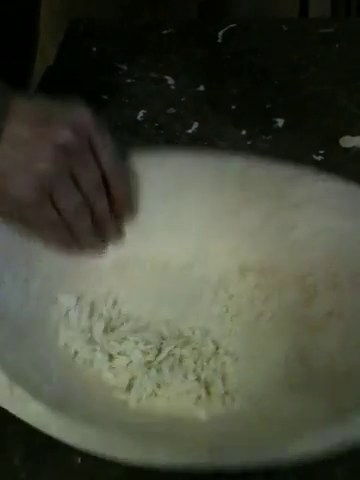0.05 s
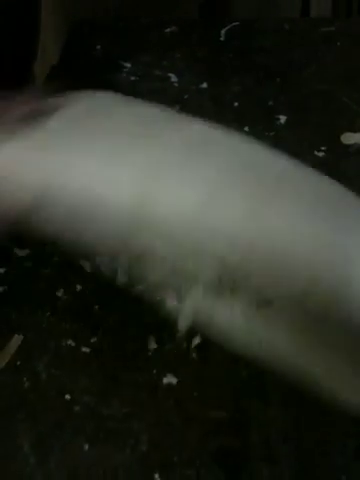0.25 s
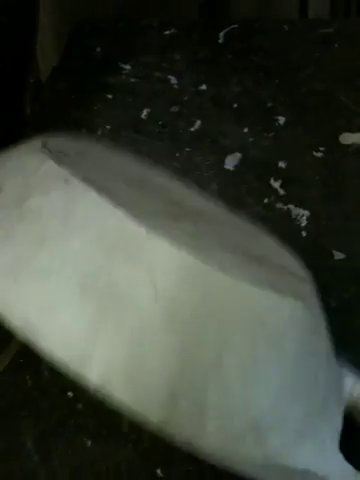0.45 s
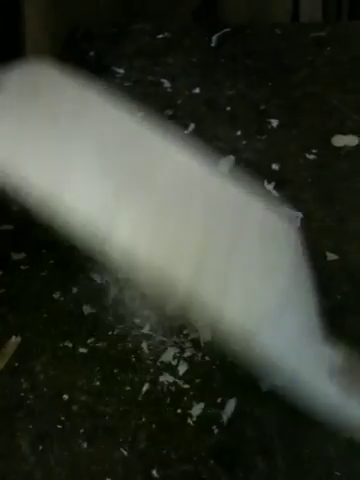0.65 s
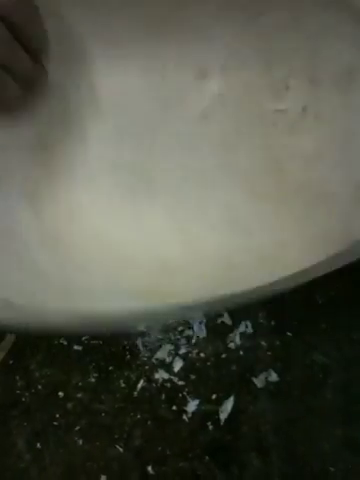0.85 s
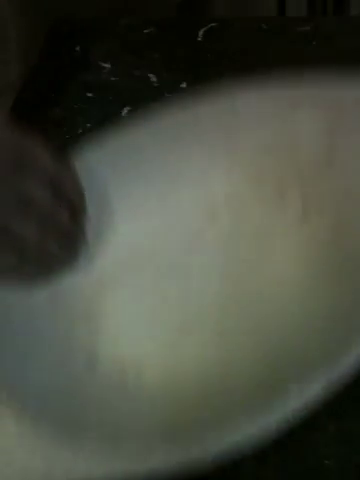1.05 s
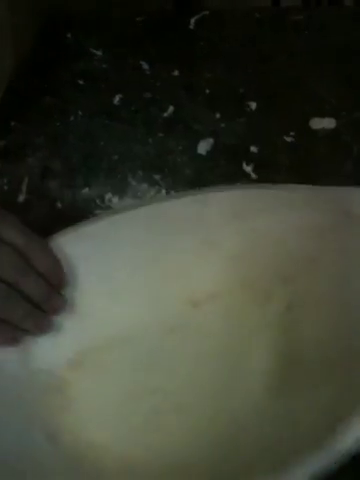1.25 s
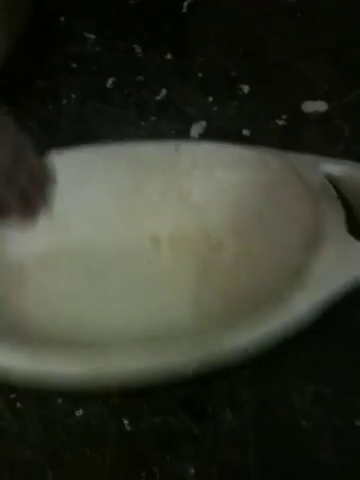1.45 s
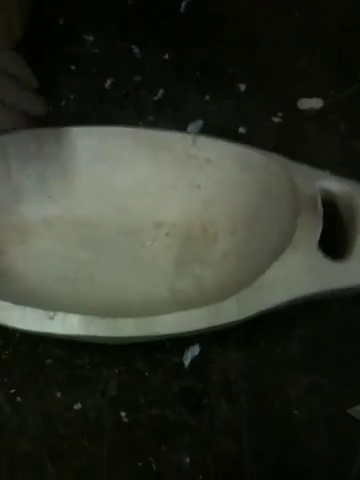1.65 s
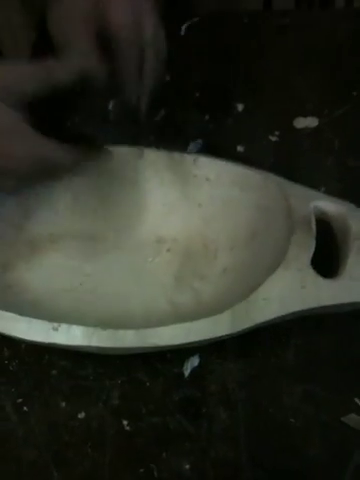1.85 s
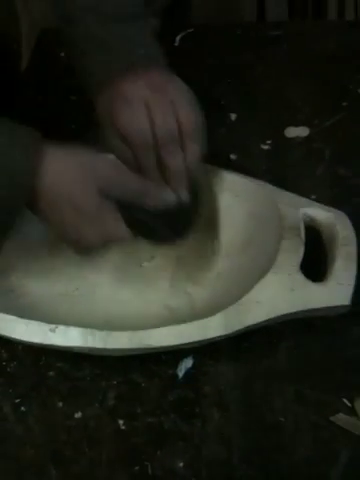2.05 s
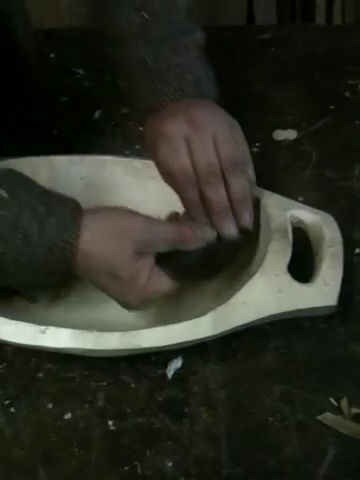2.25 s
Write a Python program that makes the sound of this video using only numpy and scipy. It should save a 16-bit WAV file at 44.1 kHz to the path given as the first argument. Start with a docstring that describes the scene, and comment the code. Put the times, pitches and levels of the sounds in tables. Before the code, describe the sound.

Hollow knocks of a wooden bowl on a bench, with soft tool strokes nearby.

```python
"""Wooden bowl on a workbench

A carved bowl is tipped over, knocked empty, rocked back and set down in a small workshop. Each impact
thuds in the bench and excites the damped modes of bowl and bench; edges click, the bowl scrapes
faintly, and two lighter clatters of taps are heard. Nearby a hand tool rubs to and fro over wood,
two strokes a second each way, its friction noise swelling with its speed."""
import sys
import numpy as np
from scipy import signal
from scipy.fft import rfft, irfft
from scipy.io import wavfile
from scipy.ndimage import uniform_filter1d

SR = 44100
rng = np.random.default_rng(int(sys.argv[2]) if len(sys.argv) > 2 else 0)


def dump(signal):
    """Clip the signal to [-1, 1] and save it as 16-bit WAV at the path in sys.argv[1]."""
    limited = np.clip(np.atleast_2d(signal).T, -1, 1)
    pcm = np.round(limited * 32767).astype(np.int16)
    wavfile.write(sys.argv[1], SR, pcm)


N = 105840

# spectrum of a contact tick: frequency_hz, relative_db
TICK_SPECTRUM = [(300, -24), (1000, 7), (1700, 2.5), (2800, 5.5), (3400, -6.5), (4100, -4.5), (4800, -19),
                 (5700, -11), (9000, -27), (16000, -53)]


def amp(db):
    """Decibels to amplitude ratio."""
    return 10 ** (np.asarray(db) / 20)


def unit_rms(x):
    """Normalisation to rms 1."""
    return x / np.sqrt(np.mean(x ** 2) + 1e-20)


def read(points, hz):
    """Interpolation on a log-frequency axis."""
    f, value = np.transpose(points)
    return np.interp(np.log(hz + 1), np.log(f + 1), value)


def add(mix, start_s, sound):
    """Superposition: a sound joins the mix at its start time."""
    at = round(start_s * SR)
    sound = sound[max(-at, 0):]
    part = mix[max(at, 0):][:len(sound)]
    part += sound[:len(part)]


def noise(spectrum):
    """Spectral shaping of white noise, rms 1."""
    gain = amp(read(spectrum, np.fft.rfftfreq(N, 1 / SR)))
    return unit_rms(irfft(rfft(rng.standard_normal(N)) * gain, N))


def pulse(spectrum, corner_hz=None, size=4096, rolloff_order=3.47):
    """Minimum-phase impact pulse, energy 1; a soft contact acts as a low-pass filter."""
    hz = abs(np.fft.fftfreq(size, 1 / SR))
    gain = amp(read(spectrum, hz))
    if corner_hz:
        gain = gain / np.hypot(1, np.minimum(hz / corner_hz, 20) ** rolloff_order)
    log_response = np.conj(signal.hilbert(np.log(gain)))
    out = np.fft.ifft(np.exp(log_response)).real[:size // 2]
    return out / np.linalg.norm(out)


def dense_modes(t60_s, size=8192):
    """Modal overlap: the crowded modes of wood merge into decaying noise, energy 1."""
    out = rng.standard_normal(size) * amp(-60 * np.arange(size) / SR / t60_s)
    return out / np.linalg.norm(out)


def rub(hz, width_hz):
    """Forced resonance: friction noise drives two resonators in series along the curve hz, rms 1."""
    phasor = np.exp(2j * np.pi * np.cumsum(hz) / SR)
    pole = np.exp(-np.pi * width_hz / SR)
    x = rng.standard_normal(len(hz))
    for _ in range(2):
        x = 2 * (phasor * signal.lfilter([1 - pole], [1, -pole], x / phasor)).real
    return unit_rms(x)


def background():
    """Noise floor: stationary broadband noise, strongest in the low middle range."""
    # frequency_hz, relative_db
    floor_spectrum = [(25, -32), (70, -16), (130, -1), (200, 5), (450, 8), (800, 2), (2500, -5),
                      (3600, -13.5), (8000, -18.5), (16000, -29.5)]
    return amp(-47.5) * noise(floor_spectrum)


def reverberation(x, size=32768, gap_samples=200):
    """Diffuse field: after a short gap, each band decays exponentially at its own rate."""
    # decay of the workshop: frequency_hz, t60_s
    decay_times = [(100, 0.44), (250, 0.47), (500, 0.32), (1500, 0.15), (4000, 0.14), (12000, 0.12)]
    hz, t, bands = signal.stft(rng.standard_normal(size), SR, nperseg=256)
    decay = np.exp(-np.log(1000) * t / read(decay_times, hz)[:, None])
    tail = signal.istft(bands * decay, SR, nperseg=256)[1]
    tail[:gap_samples] = 0
    return signal.fftconvolve(x, tail / np.linalg.norm(tail))[:N]


def patchy(x, depth_db=1.5, patch_hz=298, patch_s=0.027, size=512):
    """Random spectral modulation: the colour of friction wanders in small patches, rms 1."""
    hop = size // 4
    bands = signal.stft(x, nperseg=size, noverlap=size - hop)[2]
    field = uniform_filter1d(rng.standard_normal(bands.shape), round(patch_hz * size / SR), axis=0)
    field = unit_rms(uniform_filter1d(field, round(patch_s * SR / hop), axis=1))
    out = signal.istft(bands * amp(depth_db * field), nperseg=size, noverlap=size - hop)[1]
    return unit_rms(out[:len(x)])


def arch(length_s, skew, shape):
    """Amplitude envelope of one swell; a skew above 1 peaks late, a higher shape is narrower."""
    return abs(np.sin(np.pi * np.linspace(0, 1, round(length_s * SR)) ** skew)) ** shape


def strokes(rows, spectrum, skew, shape, fizz_skew_ratio, fizz_shape_ratio, fizz_extra_s):
    """Sliding friction: grainy hiss swells with tool speed; a hollow resonance glides and lingers."""
    grain_db, grain_s, linger_s = 1, 0.00214, 0.027
    lowpass = signal.butter(2, 4600, fs=SR, output="sos")
    out = np.zeros(N)
    for start_s, length_s, hiss_db, hollow_db, from_hz, to_hz in rows:
        roughness = unit_rms(uniform_filter1d(rng.standard_normal(N), round(grain_s * SR)))
        hiss = amp(hiss_db + grain_db * roughness) * patchy(noise(spectrum))
        body = signal.sosfiltfilt(lowpass, hiss)
        fizz = hiss - body
        swell = arch(length_s, skew, shape)
        add(out, start_s, swell * body[:len(swell)])
        swell = arch(length_s + fizz_extra_s, skew * fizz_skew_ratio, shape * fizz_shape_ratio)
        add(out, start_s, swell * fizz[:len(swell)])
        swell = arch(length_s + linger_s, skew=0.97, shape=1.46)
        hollow = rub(np.linspace(from_hz, to_hz, len(swell)), width_hz=105)
        add(out, start_s, amp(hollow_db) * swell * hollow)
    return out


def hand_tool():
    """Reciprocating friction: pushes alternate with pulls of softer, flatter-topped hiss."""
    # strokes: start_s, length_s, hiss_db, hollow_db, hollow_from_hz, hollow_to_hz
    pushes = [(0.205, 0.21, -39, -34.5, 585, 370), (0.72, 0.18, -36.5, -33, 615, 406),
              (1.215, 0.21, -40.5, -42, 506, 440), (1.72, 0.21, -39.5, -39.5, 454, 446),
              (2.215, 0.19, -38.5, -41, 554, 520)]
    pulls = [(-0.03, 0.22, -45, -45.5, 455, 400), (0.475, 0.19, -44, -34, 466, 393),
             (0.965, 0.23, -45.5, -58, 430, 437), (1.48, 0.21, -45.5, -52, 403, 400),
             (1.975, 0.27, -45.5, -44, 302, 373)]
    # friction spectra: frequency_hz, relative_db
    push_spectrum = [(60, -43), (150, -27.5), (300, 5.5), (700, 5), (1000, 4.5), (1400, -0.5), (2000, 1),
                     (2900, -4), (3500, -12), (4800, -13.5), (6500, -14.5), (9000, -17.5), (11000, -20.5),
                     (17000, -21.5)]
    pull_spectrum = [(65, -42), (130, -11), (300, -12.5), (700, 2.5), (1150, -1.5), (1900, 3.5),
                     (2900, -2.5), (3600, -9.5), (4800, -14.5), (6000, -12.5), (9000, -18), (11000, -21),
                     (17000, -22)]
    forward = strokes(pushes, push_spectrum, skew=0.92, shape=1.21,
                      fizz_skew_ratio=1.08, fizz_shape_ratio=0.87, fizz_extra_s=0.011)
    back = strokes(pulls, pull_spectrum, skew=0.86, shape=0.48,
                   fizz_skew_ratio=0.73, fizz_shape_ratio=1.23, fizz_extra_s=-0.005)
    return forward + back


def slides():
    """Friction excites a narrow band of noise as the bowl is dragged and settled."""
    # scrapes on the bench: start_s, length_s, level_db, pitch_hz, width_hz
    scrapes = [(0.04, 0.09, -47.5, 166, 151), (1.373, 0.29, -44.5, 1230, 167)]
    out = np.zeros(N)
    for start_s, length_s, level_db, pitch_hz, width_hz in scrapes:
        swell = arch(length_s, skew=1, shape=1)
        add(out, start_s, amp(level_db) * swell * rub(np.full(len(swell), pitch_hz), width_hz))
    return out


def clicks():
    """Brief contacts have wide spectra: sharp edges catch with a crisp tick as the bowl shifts."""
    # edge catches: start_s, tick_db, snap_db
    catches = [(0.2128, -16, -26.5), (0.229, -10, -27), (1.494, -23, -30)]
    # spectrum of the snap: frequency_hz, relative_db
    snap_spectrum = [(1000, -52), (4000, -5), (6500, 9), (10000, 2), (16000, -9)]
    out = np.zeros(N)
    for start_s, tick_db, snap_db in catches:
        contact = amp(tick_db) * pulse(TICK_SPECTRUM) + amp(snap_db) * pulse(snap_spectrum)
        add(out, start_s, signal.fftconvolve(contact, dense_modes(t60_s=0.036)))
    return out


def taps():
    """Heavy damping: light impacts on wood clatter with no pitched ring."""
    # light impacts: start_s, relative_db, corner_hz
    impacts = [(0.4351, -16, 2800), (0.443, -15.5, 1800), (0.458, -23, 2200), (0.473, -21, 1800),
               (1.940, -15.5, 1510), (1.949, -21, 1020), (1.963, -18.5, 1100), (1.978, -21.5, 1000)]
    # spectrum of a tap: frequency_hz, relative_db
    tap_spectrum = [(60, -30), (170, -8.5), (330, 11.5), (600, 9), (850, -1), (1200, 2.5), (1800, -12),
                    (3000, -19), (10000, -38)]
    out = np.zeros(N)
    for start_s, relative_db, corner_hz in impacts:
        tap = signal.fftconvolve(pulse(tap_spectrum, corner_hz), dense_modes(t60_s=0.061))
        add(out, start_s, amp(12 + relative_db) * tap)
    return out


def knocks():
    """Impact excitation: each contact gives a thud, a tick and free vibration of bowl and bench."""
    # bowl meets bench: start_s, thud_relative_db, corner_hz, ring_db, tick_relative_db, t60_ratio
    impacts = [(0.215, -22, 464, -15, -32, 0.46), (0.2275, -11.5, 236, -5, -24, 0.33),
               (0.2425, -7.5, 344, -5.5, -45, 0.36), (0.2483, -15.5, 356, -10, -47, 0.32),
               (0.293, -28, 500, -21, -33, .4), (0.4904, -1.5, 438, 0.5, -11, 1),
               (0.5079, -7.5, 1300, -4.5, -18.5, 0.79), (0.5268, -5.5, 463, -3, -32, 0.75),
               (0.557, -19, 635, -14, -18.5, 0.76), (0.576, -9.5, 540, -13, -31, 0.8),
               (0.587, -14, 456, -8.5, -37, 0.94), (0.604, -7, 463, -13, -35, 1),
               (0.634, -25, 655, -13.5, -42, 0.94), (0.6585, -15, 495, -20, -36, 1),
               (1.289, -15, 400, -36, -14, .6), (1.2997, -11.5, 433, -4, -29, 0.53),
               (1.319, -15, 690, -17, -35, 0.6), (1.327, -16.5, 900, -20, -33, 1),
               (1.341, -24, 616, -5, -39, 0.95), (1.3545, -17, 740, -17, -35, 0.69),
               (1.367, -28, 606, -26, -43, 1), (1.435, -23.5, 714, -41, -48, 1),
               (1.455, -15, 483, -10.5, -24.5, 0.93), (1.4947, -11.5, 1000, -9.5, -25, 0.33),
               (1.505, -21, 800, -13, -41, 0.6), (1.521, -29, 290, -9, -45, 0.77),
               (1.54, -27.5, 290, -18.5, -50, 0.26)]
    # normal modes: frequency_hz, relative_db, free_t60_s
    bowl_modes = [(198.7, -11, 0.2), (272.3, -21.5, 0.16), (343.8, -29, 0.42), (393.4, -27.5, .2),
                  (518, -30.5, 0.24), (580, -38.5, 0.25), (646, -29, 0.3), (785.3, -25.5, 0.14),
                  (1140, -32.5, 0.062), (1246, -40, 0.16), (1470, -49, 0.066), (2500, -58, 0.094)]
    bench_modes = [(116.6, -24.5, 0.28), (162.7, -20, 0.16)]
    # spectrum of the thud: frequency_hz, relative_db
    thud_spectrum = [(30, -33.5), (65, -40.5), (80, -26.5), (100, -3.5), (150, -1), (230, 2.5), (400, -1),
                     (800, -8), (1500, -13.5), (3000, -7), (8000, -2)]
    thud_gain_db, tick_gain_db, ring_rise_s = 15, 3.5, 0.0024
    out, t = np.zeros(N), np.arange(SR // 2) / SR
    for start_s, thud_db, corner_hz, ring_db, tick_db, t60_ratio in impacts:
        bench = amp(-4) * dense_modes(t60_s=0.07)
        bench[0] += 1  # the direct pulse
        thud = signal.fftconvolve(pulse(thud_spectrum, corner_hz), bench)
        add(out, start_s, -amp(thud_gain_db + thud_db) * thud)
        ring = np.zeros(len(t))
        for hz, db, free_t60_s in bowl_modes + bench_modes:
            strength = amp(db) / np.hypot(1, hz / (2 * corner_hz))  # soft contact weakens high modes
            decay = np.exp(-np.log(1000) * t / (free_t60_s * t60_ratio))  # below 1 the hand damps it
            ring += strength * decay * np.sin(2 * np.pi * hz * t)
        add(out, start_s, -amp(ring_db) * ring * (1 - np.exp(-t / ring_rise_s)))
        tick = signal.fftconvolve(pulse(TICK_SPECTRUM), dense_modes(t60_s=0.05))
        add(out, start_s, amp(tick_gain_db + tick_db) * tick)
    return out


def scene():
    """Superposition of direct sound, the workshop's reverberant field and the noise floor."""
    wood = knocks() + taps() + clicks() + slides()
    tool = hand_tool()
    room = reverberation(amp(-15) * wood + amp(-8.5) * tool)
    return (wood + tool + room + background())[None]


def record(dry, low_cut_hz=85, high_cut_hz=17250):
    """Band limiting: the microphone's bass cut, then a steep low-pass."""
    thin = signal.sosfilt(signal.butter(3, low_cut_hz, "high", fs=SR, output="sos"), dry)
    lowpass = signal.firwin(511, high_cut_hz, window=("kaiser", 9), fs=SR)
    return signal.oaconvolve(thin, lowpass[None], "same")


dry = scene()
out = record(dry)
dump(out)
```